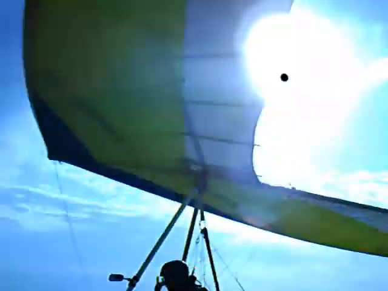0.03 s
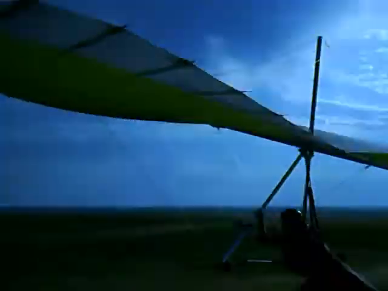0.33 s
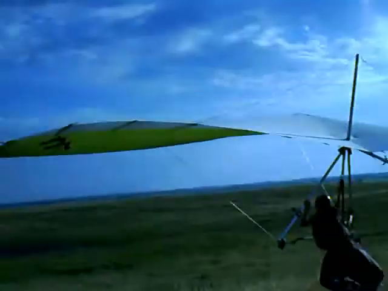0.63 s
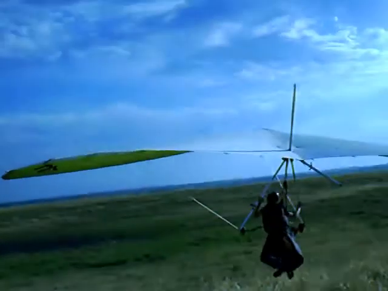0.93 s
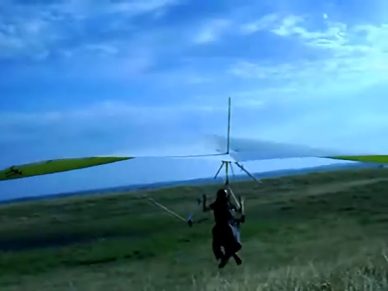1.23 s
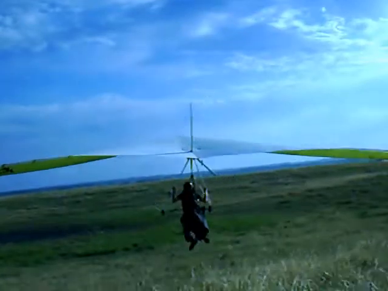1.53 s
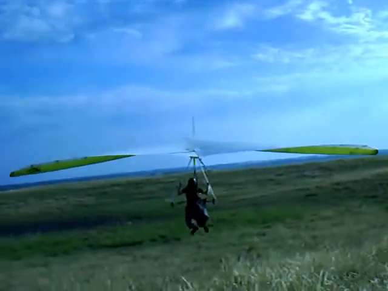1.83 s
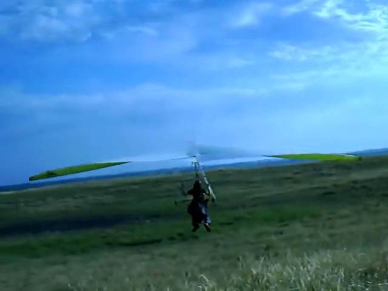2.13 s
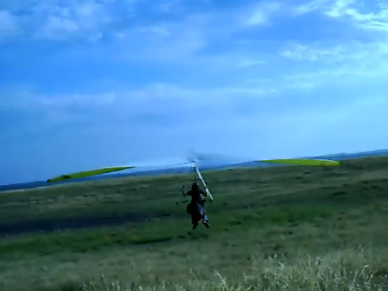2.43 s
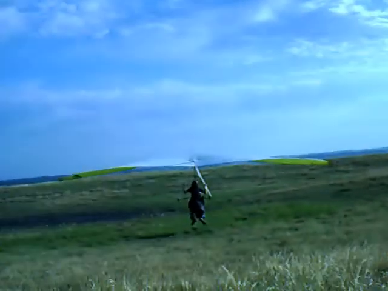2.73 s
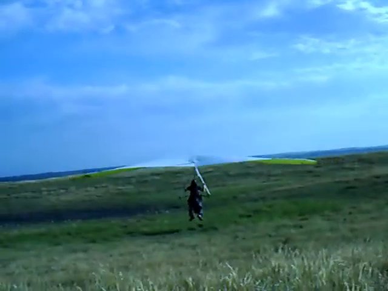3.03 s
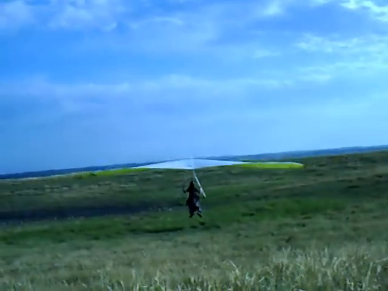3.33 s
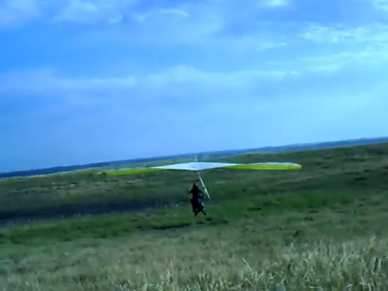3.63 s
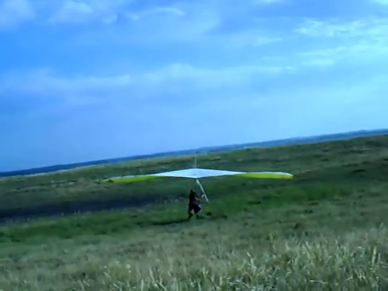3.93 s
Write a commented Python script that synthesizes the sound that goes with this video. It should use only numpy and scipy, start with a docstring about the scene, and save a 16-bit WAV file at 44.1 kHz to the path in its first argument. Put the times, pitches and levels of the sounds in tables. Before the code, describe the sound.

Gusts of wind hit the microphone on a grassy hill, with a loud pop and a short roar as a hang glider sweeps by. The rush settles into hiss and lighter gusts, with faint bird chirps near the end.

```python
"""Hang glider lifting off a windy hill

A hang glider takes off right over a small camera on a grassy hill and sails away. Gusts and the
wing's wake buffet and pop the microphone. The sail rustles, the frame rattles, and air rushes and
whistles in the rigging, fading into soft hiss, dry ticks and a bird's chirps. The camera overloads
on the biggest pop, and its coarse sampling adds a treble fizz."""
import sys
import numpy as np
from scipy import signal
from scipy.fft import rfft, irfft
from scipy.io import wavfile
from scipy.ndimage import uniform_filter1d

SR = 44100
rng = np.random.default_rng(int(sys.argv[2]) if len(sys.argv) > 2 else 0)


def log_audio(samples):
    """Write samples as a 16-bit WAV file to the path given in sys.argv[1]."""
    # one column per channel
    frames = np.atleast_2d(samples).T
    # limit to full scale, then quantise
    limited = np.clip(frames, -1, 1)
    pcm = np.round(limited * 32767).astype(np.int16)
    wavfile.write(sys.argv[1], SR, pcm)


N = 176400
TIME = np.arange(N) / SR
FREQ_HZ = np.fft.rfftfreq(N, 1 / SR)
HOLD = 4  # output samples for which the camera holds each of its own


def undb(db):
    """Decibels to gain."""
    return 10 ** (np.asarray(db) / 20)


def unit(x):
    """Scale to rms 1."""
    return x / np.sqrt(np.mean(x ** 2))


def curve(rows):
    """Join (time_s, value) rows by straight lines."""
    return np.interp(TIME, *np.array(rows).T)


def colour(eq):
    """Gain at each frequency bin for an EQ curve of (freq_hz, gain_db) rows."""
    freq_hz, gain_db = np.array(eq).T
    return undb(np.interp(np.log(FREQ_HZ + 1e-9), np.log(freq_hz), gain_db))


def noise(eq):
    """Coloured noise within the camera's band, rms 1."""
    in_band = FREQ_HZ < SR / HOLD / 2
    return unit(irfft(rfft(rng.standard_normal(N)) * colour(eq) * in_band, N))


def walk(rate_hz):
    """Smooth random drift: stepped levels slewed twice, rms 1."""
    step = int(SR / rate_hz)
    levels = np.repeat(rng.standard_normal(N // step + 1), step)
    return unit(uniform_filter1d(uniform_filter1d(levels, step), step)[:N])


def swell(peak_s, half_width_s):
    """A bell-shaped rise and fall."""
    return np.exp(-2 * np.minimum(((TIME - peak_s) / half_width_s) ** 2, 20))


def bursts(hits, eq, grain_db):
    """Short swells of grainy noise."""
    grain = undb(grain_db * np.minimum(walk(600), 2))
    envelope = sum(undb(level_db) * swell(peak_s, half_width_s) for peak_s, half_width_s, level_db in hits)
    return unit(noise(eq) * grain) * envelope


def buffeting(eddies_per_s=1800, spread_db=2.5, flutter_db=1.33):
    """A hail of eddies hits the diaphragm; stronger gusts are louder and brighter."""
    # wind on the microphone before and after the wing passes: time_s, level_db
    gust_before = [(0.0, -26.5), (0.168, -27), (0.18, -27.5), (0.386, -31.5), (0.48, -27.5)]
    gust_after = [(0.55, -25), (0.84, -22.5), (0.9, -24.5), (0.93, -32.5), (0.95, -29.5), (1.12, -51.5),
                  (1.23, -33.5), (1.31, -44), (1.37, -33.5), (1.59, -39), (1.63, -32.5), (1.68, -49),
                  (1.75, -39), (1.94, -38), (1.96, -51), (2.11, -32.5), (2.35, -53), (2.39, -50.5),
                  (2.62, -66), (2.75, -52), (2.8, -63), (3.11, -45), (3.53, -63.5), (3.59, -44.5),
                  (3.75, -36.5), (3.79, -38.5), (3.85, -33.5), (3.92, -39.5), (3.97, -34), (4.0, -41)]
    # rumble colour at the reference strength: freq_hz, gain_db
    buffet_eq = [(20, -4.5), (45, -1), (75, 0), (120, 0), (200, -1), (450, -8.5), (750, -14), (1100, -23),
                 (1600, -31.5), (2500, -40.5), (4500, -36)]
    reference_db, pivot_hz, brightest_hz = -29.5, 157, 810
    gust_db = curve(list(gust_before) + list(gust_after))
    tilt_db_per_octave = 0.31 * (gust_db - reference_db)
    kicks = (rng.random(N) < eddies_per_s / SR) * np.sign(rng.standard_normal(N))
    strength = undb(spread_db * np.minimum(rng.exponential(size=N), 3))
    eddies = unit(irfft(rfft(kicks * strength) * colour(buffet_eq), N))
    spectrum = rfft(eddies)
    out = np.zeros(N)
    for centre_hz in 20 * 2 ** (np.arange(17) / 2):  # half-octave bands
        band = np.maximum(1 - 2 * np.abs(np.log2((FREQ_HZ + 1e-9) / centre_hz)), 0)
        octaves = np.log2(np.clip(centre_hz, pivot_hz / 2, brightest_hz) / pivot_hz)
        out += irfft(spectrum * band, N) * undb(tilt_db_per_octave * octaves)
    return out * undb(gust_db + flutter_db * walk(50))


def wake(spread_octaves=0.77, rough_db=2):
    """The wing's wake roars over the microphone, sinking in pitch as its eddies grow and slow."""
    # path of the roar: time_s, level_db, centre_hz
    roar = [(0.631, -50, 702.4), (0.677, -36, 679.3), (.705, -19.5, 631), (.74, -30, 517.5),
            (.785, -23.5, 442.4), (0.862, -30, 391.3), (.92, -32, 357), (1.052, -72, 302)]
    time_s, level_db, centre_hz = np.array(roar).T
    octaves = np.log2((FREQ_HZ + 1) / centre_hz.max())
    hump = np.exp(-(octaves / spread_octaves) ** 2 / 2)
    eddies = unit(irfft(rfft(rng.standard_normal(N)) * hump, N))
    speed = np.interp(TIME, time_s, centre_hz) / centre_hz.max()
    swept = np.interp(np.cumsum(speed), np.arange(N), eddies)
    envelope = np.interp(TIME, time_s, undb(level_db), left=0, right=0)
    return swept * envelope * undb(rough_db * walk(200))


def pops(rebound=0.44):
    """Each strong eddy sucks the diaphragm out, and it swings back."""
    # single eddies: peak_s, level_db, centre_hz
    eddies = [(0.048, -29, 475), (.1446, -13, 600), (.4958, 6.5, 670), (.503, -11, 560), (0.5168, -6, 540),
              (0.5583, -7, 520), (0.57, -11.5, 584), (0.5797, -11.5, 527), (.603, -17, 850),
              (0.643, -12.5, 910), (0.7163, -12, 620), (0.7597, -9.5, 397), (.82, -16, 477),
              (1.2284, -23.5, 363), (1.3843, -27, 360), (2.113, -30, 218), (2.1235, -22, 644),
              (3.6748, -31, 525), (3.8515, -22.5, 480), (3.8562, -29, 520)]
    out = np.zeros(N)
    for peak_s, level_db, centre_hz in eddies:
        swing = np.clip(np.pi * centre_hz * (TIME - peak_s), -10, 10)
        out += undb(level_db) * (2 * swing ** 2 - 1 + rebound * swing) * np.exp(-swing ** 2)
    return out


def puffs():
    """Brief puffs of air sputter on the microphone."""
    # puffs: peak_s, half_width_s, level_db
    hits = [(.048, 0.0093, -25), (.147, 0.0068, -19.5), (.162, 0.01, -27), (.612, 0.0047, -19),
            (1.228, 0.015, -34.5), (1.622, 0.0056, -39), (1.759, 0.0064, -34), (2.03, 0.013, -42),
            (2.086, 0.025, -35.5), (3.675, 0.0041, -35), (3.853, 0.011, -38), (3.897, .004, -33),
            (3.968, 0.023, -35.5)]
    # their dull colour: freq_hz, gain_db
    puff_eq = [(60, -24), (180, 1), (420, 1.5), (900, -18.5), (1500, -14.5), (2500, -24), (4500, -57)]
    return bursts(hits, puff_eq, grain_db=3)


def rush(flicker_db=1):
    """Air tears past the sail and rigging, fading as the glider leaves."""
    # fade of the airflow: time_s, level_db
    fade = [(0, -35.5), (.25, -35.5), (.45, -34), (.65, -42), (.85, -40.5), (1.1, -39.5), (1.5, -45.5),
            (2.1, -50), (2.75, -52), (3.3, -54.5), (4, -52)]
    # its colour: freq_hz, gain_db
    rush_eq = [(150, 5), (450, 1.5), (750, 2), (1100, 4.5), (1600, -8), (2400, -5), (3400, -12), (5400, -8)]
    return noise(rush_eq) * undb(curve(fade) + flicker_db * walk(29.86))


def sail_rustle():
    """The cloth of the sail and harness crinkles."""
    # crinkles: peak_s, half_width_s, level_db
    hits = [(.266, .012, -29.5), (.292, 0.017, -33.5), (.322, 0.014, -42), (.43, 0.014, -41)]
    # cloth colour: freq_hz, gain_db
    cloth_eq = [(400, -9), (1000, -2.5), (1600, 1), (2500, -4), (3700, -13), (5400, -6.5)]
    return bursts(hits, cloth_eq, grain_db=6.5)


def frame_rattle():
    """The frame gives one small, hollow rattle."""
    # the rattle: peak_s, half_width_s, level_db
    hits = [(.4095, 0.0081, -22.5)]
    # its hollow colour: freq_hz, gain_db
    frame_eq = [(300, -25), (600, 1), (780, 2), (1100, -9), (2200, -24), (5000, -39)]
    return bursts(hits, frame_eq, grain_db=-2.5)


def whistles():
    """Vortices shed by the wires sing in narrow, unsteady tones."""
    # wire tones: peak_s, half_width_s, pitch_hz, bandwidth_hz, level_db
    tones = [(1.796, 0.35, 960, 40, -54), (2.437, 0.45, 1838, 14, -58), (2.747, .55, 993, 80, -56.5)]
    out = np.zeros(N)
    for peak_s, half_width_s, pitch_hz, bandwidth_hz, level_db in tones:
        phase = 2 * np.pi * pitch_hz * TIME
        tone = walk(bandwidth_hz) * np.cos(phase) + walk(bandwidth_hz) * np.sin(phase)
        out += undb(level_db) * swell(peak_s, half_width_s) * tone
    return out


def dry_ticks():
    """Dry ticks and scratches, as of grass stalks."""
    # ticks: peak_s, half_width_s, level_db
    hits = [(.132, 0.0072, -37), (.489, 0.012, -29), (.571, .006, -31.5), (.724, 0.0018, -37),
            (.935, 0.0034, -37), (3.9145, 0.0022, -33), (3.93, .002, -41), (3.946, .008, -46),
            (3.97, 0.033, -48.5)]
    # their crisp colour: freq_hz, gain_db
    tick_eq = [(1000, -2), (2000, -10), (3000, 0), (5400, -8)]
    return bursts(hits, tick_eq, grain_db=1)


def bird(waver=0.012):
    """A bird chirps three quick gliding notes."""
    # notes: start_s, length_s, from_hz, to_hz, level_db
    notes = [(3.442, 0.014, 2320, 2230, -47), (3.5, 0.039, 2440, 2120, -44), (3.55, 0.016, 2200, 2270, -44)]
    wobble = 1 + waver * walk(400)
    out = np.zeros(N)
    for start_s, length_s, from_hz, to_hz, level_db in notes:
        progress = np.clip((TIME - start_s) / length_s, 0, 1)
        pitch_hz = (from_hz + (to_hz - from_hz) * progress) * wobble
        envelope = np.sqrt(np.abs(np.sin(np.pi * progress)))
        out += undb(level_db) * envelope * np.sin(2 * np.pi * np.cumsum(pitch_hz) / SR)
    return out


def background(hiss_db=-48, sway_db=0.77, whine_db=-64.5, whine_hz=2885):
    """A soft bed of wind in the grass and camera hiss, with a thin electronic whine."""
    # colour of the bed: freq_hz, gain_db
    hiss_eq = [(30, 10.5), (120, -6), (270, -8), (550, 2), (1000, -2.5), (1500, -3), (2500, -4.5),
               (3500, -4.5), (5400, -2.5)]
    hiss = noise(hiss_eq) * undb(hiss_db + sway_db * walk(4.66))
    whine = undb(whine_db) * np.sqrt(2) * np.sin(2 * np.pi * whine_hz * TIME)
    return hiss + whine


def scene():
    """Wind, glider and hillside at one microphone."""
    wind = buffeting() + wake() + puffs() + pops()
    glider = rush() + sail_rustle() + frame_rattle() + whistles()
    hillside = dry_ticks() + bird() + background()
    return (wind + glider + hillside)[None]


def record(dry):
    """The camera saturates and holds each coarse sample, mirroring the sound into a treble fizz."""
    hardness, top_hz = 12, 15800
    limited = dry / (1 + np.abs(dry) ** hardness) ** (1 / hardness)
    held = np.repeat(limited[:, ::HOLD], HOLD, axis=1)[:, :N]
    lowpass = signal.ellip(10, 0.05, 60, top_hz, fs=SR, output="sos")
    return signal.sosfiltfilt(lowpass, held)


dry = scene()
out = record(dry)
log_audio(out)
```